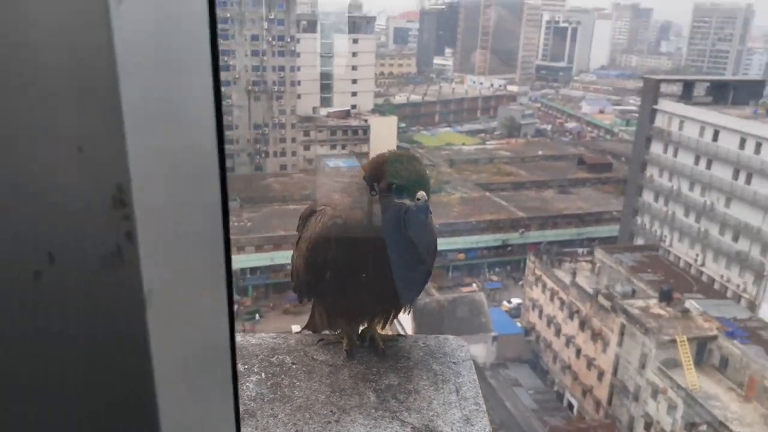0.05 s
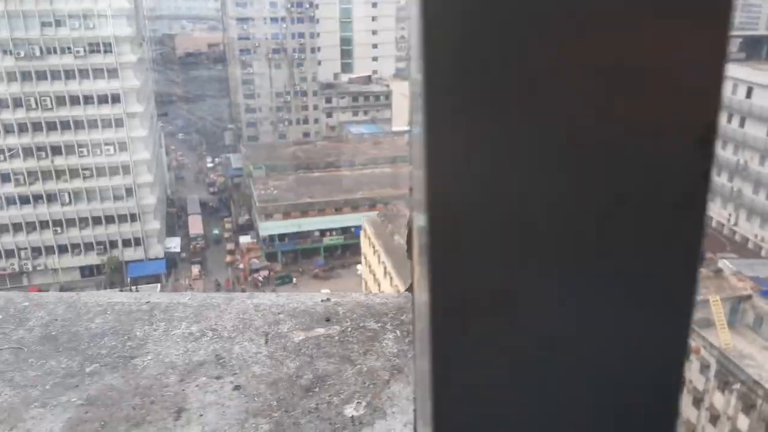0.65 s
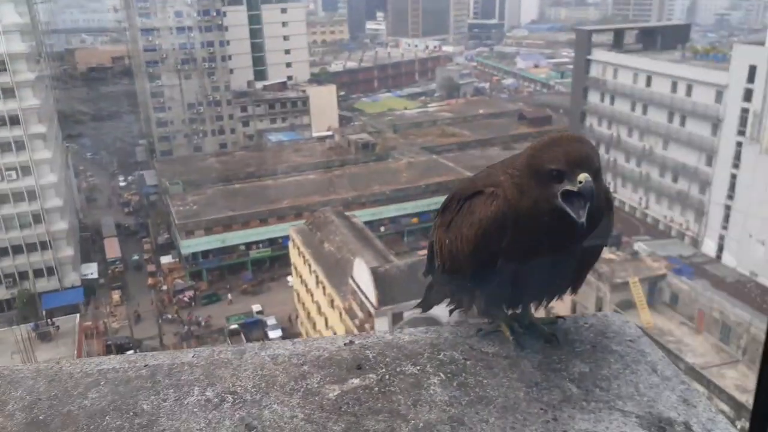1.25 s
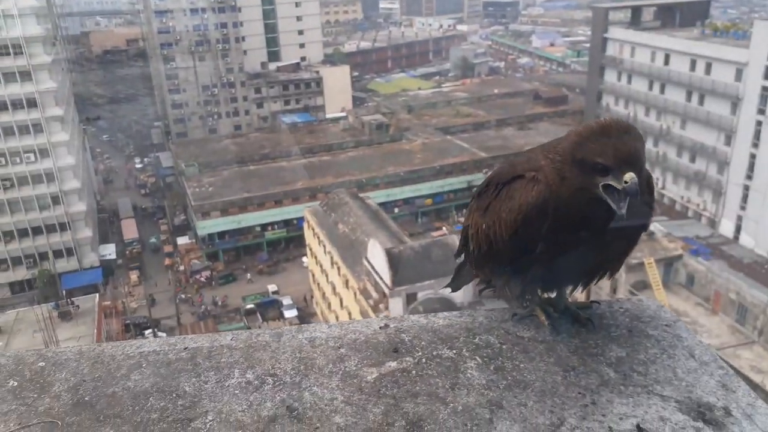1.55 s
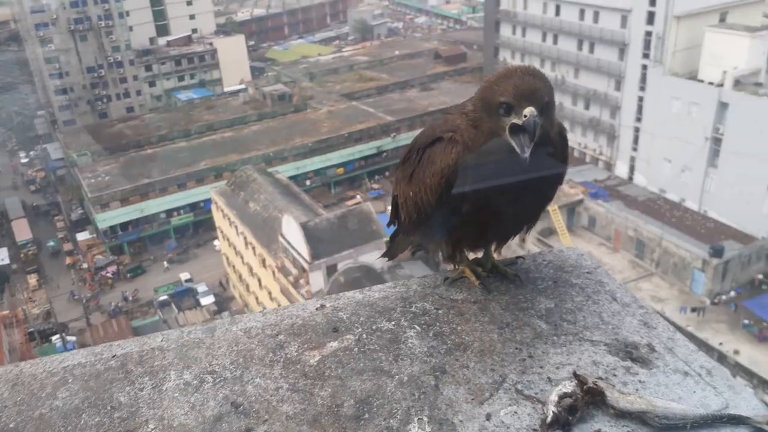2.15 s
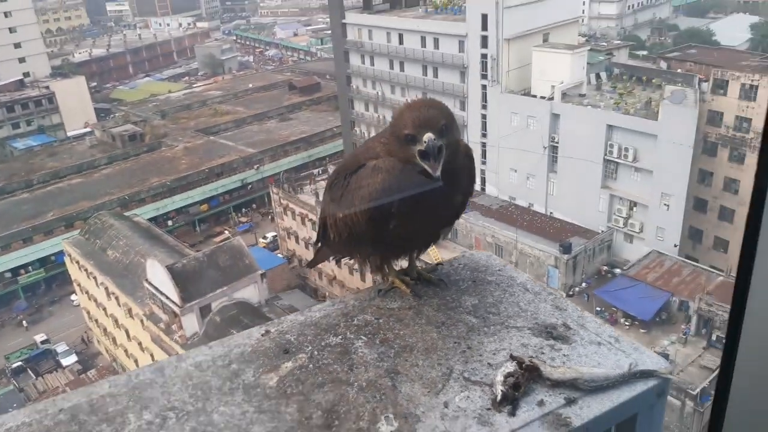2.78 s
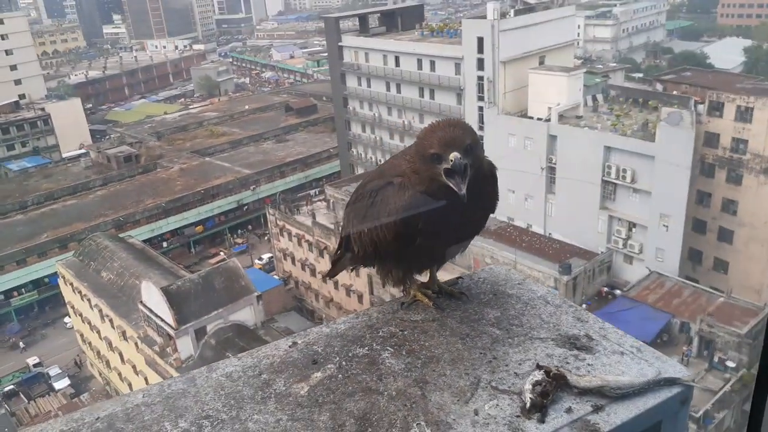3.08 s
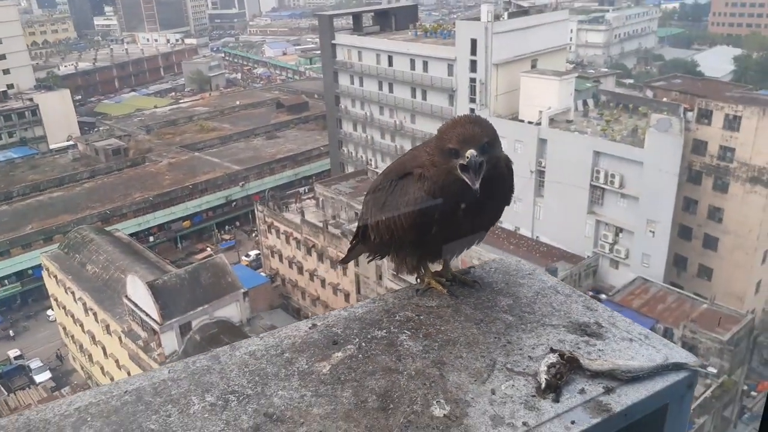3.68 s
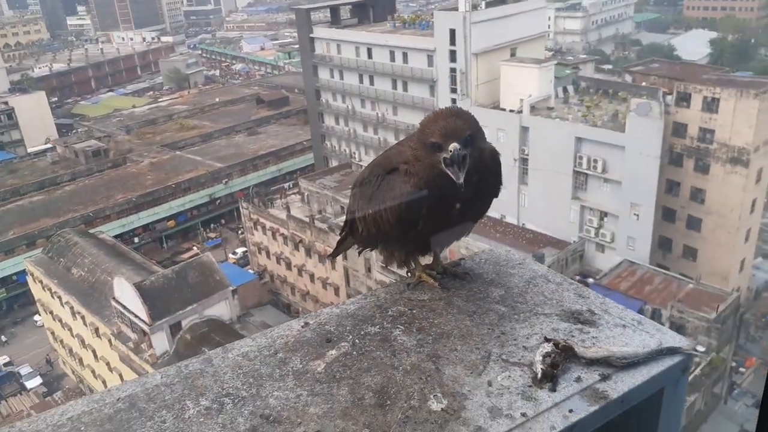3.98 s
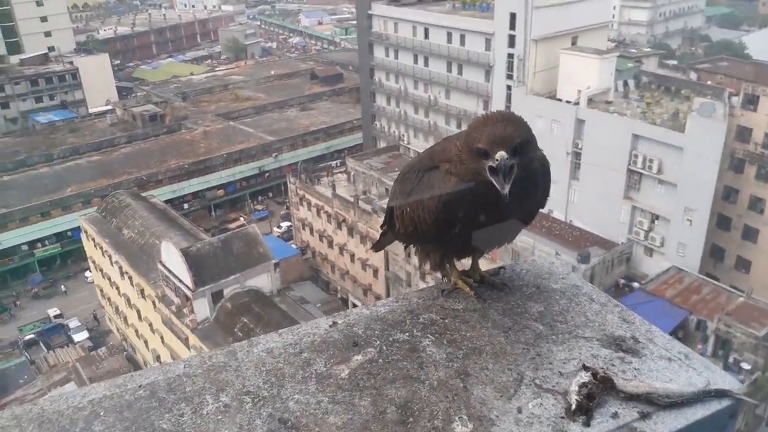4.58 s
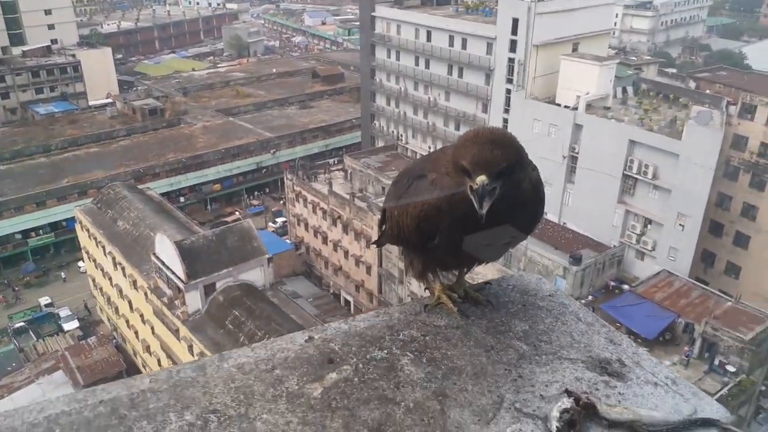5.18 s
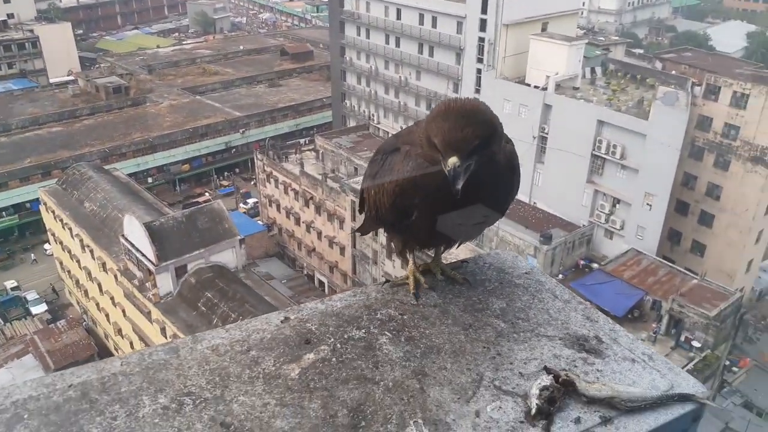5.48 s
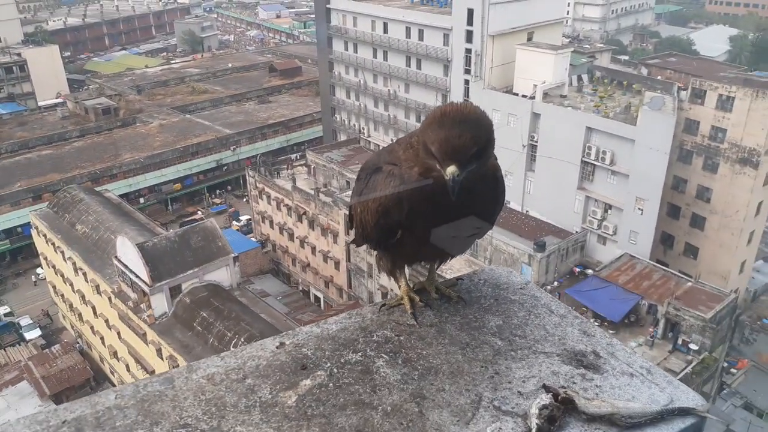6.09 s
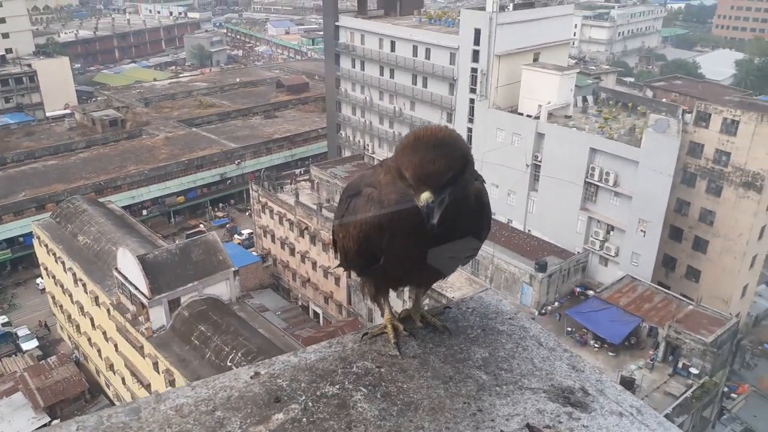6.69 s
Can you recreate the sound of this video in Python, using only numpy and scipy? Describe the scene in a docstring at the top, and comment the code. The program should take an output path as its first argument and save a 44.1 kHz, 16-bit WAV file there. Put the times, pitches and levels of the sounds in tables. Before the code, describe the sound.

A kite calls close by on a high ledge, each call a shrill, slightly hoarse whistle followed by a quick chitter of short notes. The call repeats about once a second, ringing a little in a bare room. Late on, a sliding window scrapes, rumbles and clacks sharply, then the bird calls once more. Traffic hums faintly far below, and the hand-held microphone picks up soft bumps and sleeve rustle.

```python
"""A kite calls from a high ledge at an open window: one long whistle, then a chitter of short arched notes.
Tension in its syrinx drives pitch and timbre, throat and beak colour the voice, and it rings on in the
bare room behind. The window is shoved along its track, scraping on grit and clacking once.
A hand-held camera is bumped and rubbed by a sleeve, and the city hums far below."""
import sys
import numpy as np
from scipy import signal
from scipy.fft import rfft, irfft, next_fast_len
from scipy.io import wavfile
from scipy.ndimage import map_coordinates

SR = 44100
rng = np.random.default_rng(int(sys.argv[2]) if len(sys.argv) > 2 else 0)


def pcm_store(signal):
    """Save signal as 16-bit PCM."""
    levels = np.round(np.clip(np.atleast_2d(signal), -1, 1) * 32767)
    wavfile.write(sys.argv[1], SR, levels.astype(np.int16).T)


N = 306054
TIME = np.arange(N) / SR


def amp(db):
    return 10 ** (np.asarray(db) / 20)


def unit_rms(x):
    return x / np.sqrt(np.mean(x ** 2) + 1e-20)


def lookup(rows, x, column=1):
    """A column interpolated linearly over the first."""
    columns = np.transpose(rows)
    return np.interp(x, columns[0], columns[column])


def at_hz(rows, hz):
    """Rows of f/Hz, value interpolated on a log axis."""
    row_hz, values = np.transpose(rows)
    return np.interp(np.log(hz + 1), np.log(row_hz + 1), values)


def wobble(knots_per_s):
    """Smooth random curve."""
    knots = rng.standard_normal(int(N * knots_per_s / SR) + 4)
    return map_coordinates(knots, [TIME * knots_per_s])


def filtered(x, response):
    """Zero-phase filter with gain response(hz)."""
    size = next_fast_len(N + SR // 2)
    return irfft(rfft(x, size) * response(np.fft.rfftfreq(size, 1 / SR)), size)[..., :N]


def pan(right_db):
    """Left and right gains."""
    return amp(np.array([[-1], [1]]) * right_db / 2)


def stroke(start_s, length_s, attack_s, t60_s):
    """Envelope: rise, hold, decay."""
    age_s = TIME - start_s
    return np.clip(age_s / attack_s, 0, 1) * amp(-60 * np.maximum(age_s - length_s, 0) / t60_s)


def strokes(rows, swell, t60_s):
    """Summed strokes, each easing in over the share swell of its length."""
    envelope = np.zeros(N)
    for start_s, length_s, db in rows:
        attack_s = swell * length_s
        ease = np.clip((TIME - start_s) / attack_s, 0, 1)
        envelope += amp(db) * ease * stroke(start_s, length_s, attack_s, t60_s)
    return envelope


def blows(rows, attack_s):
    """Summed impact envelopes with exponential decay."""
    envelope = np.zeros(N)
    for start_s, db, t60_s in rows:
        age_s = np.maximum(TIME - start_s, 0)
        envelope += amp(db - 60 * age_s / t60_s) * (1 - np.exp(-age_s / attack_s))
    return envelope


# diffuse field: f/Hz, left-right correlation
COHERENCE = [(60, 0.98), (130, 0.95), (290, 0.93), (640, 0.61), (1400, -0.12), (3000, -0.25), (15000, 0.11)]


def noise(spectrum):
    """Stereo noise of rms 1, alike in the bass, unrelated in the treble."""
    def mid_side_gains(hz):
        angle = np.arccos(np.clip(at_hz(COHERENCE, hz), -1, 1)) / 2
        return amp(at_hz(spectrum, hz)) * [np.cos(angle), np.sin(angle)]
    mid, side = filtered(rng.standard_normal((2, N)), mid_side_gains)
    return unit_rms(np.array([mid + side, mid - side]))


# bare room at decay_scale 1: f/Hz, t60/s
ROOM_DECAY = [(100, 0.68), (300, 0.89), (900, 1.07), (2000, 1.1), (3800, 0.99), (5500, 0.61), (8000, 0.53),
              (15000, 0.24)]


def room(x, decay_scale):
    """Reverberation off hard walls; treble dies first."""
    white = noise([(20, 0), (20000, 0)])[:, :SR + SR // 2]
    hz, age_s, bins = signal.stft(white, SR, nperseg=256)
    t60_s = decay_scale * at_hz(ROOM_DECAY, hz)[:, None]
    tail = signal.istft(bins * amp(-60 * age_s / t60_s), SR, nperseg=256)[1]
    tail /= np.linalg.norm(tail, axis=1, keepdims=True)
    delayed = np.pad(tail, ((0, 0), (SR // 400, 0)))
    return signal.fftconvolve(np.atleast_2d(x), delayed, axes=1)[:, :N]


# far horns and brakes: start/s, end/s, f/Hz, level/dB
HORNS_AND_BRAKES = [(0, 0.154, 2820, -63.5), (0, 0.123, 1105, -69), (0.363, 0.493, 533, -65),
                    (0.48, 0.618, 3150, -53.5)]


def horns_and_brakes(ramp_s=0.028, jitter=0.0078):
    """Brief wavering tones, heard only as reverberation."""
    tones = np.zeros(N)
    for start_s, end_s, hz, db in HORNS_AND_BRAKES:
        gate = np.clip(np.minimum(TIME - start_s, end_s - TIME) / ramp_s, 0, 1)
        pitch_hz = hz * (1 + jitter * wobble(300))
        tones += amp(db) * gate * np.sin(2 * np.pi * np.cumsum(pitch_hz) / SR)
    return amp(5) * room(tones, decay_scale=0.29)


# traffic hum and street wash: f/Hz, relative density/dB
TRAFFIC_SPECTRUM = [(13, -66.5), (22, -29.5), (47, -11), (81, 3.5), (123, -3.5), (155, -3), (269, -9),
                    (349, -8), (376, -14.5), (487, -9), (700, -18.5), (910, -47), (1540, -120)]
STREET_SPECTRUM = [(180, -54.5), (300, -33), (356, 8), (466, -14), (538, -23), (586, -7), (1100, -6),
                   (2650, -2.5), (3180, -2.5), (3890, -13.5), (9000, -33), (11700, -88), (19800, -120)]


def city(hum_db=-53, wash_db=-55):
    """Traffic far below, louder while the microphones are at the open gap."""
    at_gap = stroke(start_s=0.76, length_s=5, attack_s=0.22, t60_s=2.44)
    hum = amp(hum_db + 5 * at_gap + 0.22 * wobble(8.6)) * noise(TRAFFIC_SPECTRUM)
    wash = amp(wash_db + 2 * at_gap + 1.2 * wobble(7.2)) * noise(STREET_SPECTRUM)
    return hum * pan(right_db=0.5) + wash * pan(right_db=4)


# hand bumps: t/s, level/dB, t60/s
HAND_BUMPS = [(.828, -38.5, 0.44), (1.24, -40.5, 0.99), (1.36, -44, 0.75), (2.14, -45, 0.52),
              (4.195, -36, 0.4), (6.825, -37, .6), (6.885, -41, 0.53)]
# sleeve brushes: start/s, length/s, level/dB
SLEEVE_BRUSHES = [(.11, .23, -60.5), (.76, 0.34, -59.5), (1.32, 0.072, -54.5), (1.49, .35, -59),
                  (2.08, 0.11, -56.5), (2.35, 0.55, -61), (3.2, 0.55, -68.5), (3.83, 0.11, -57.5),
                  (4.05, .4, -53), (4.55, 0.31, -59.5), (6.39, 0.045, -75.5), (6.82, 0.15, -54)]
# bump and sleeve noise: f/Hz, relative density/dB
BUMP_SPECTRUM = [(53, -43), (90, -17), (141, -3.5), (168, 4.5), (231, -8), (285, -2.5), (545, -9.5),
                 (959, -20.5), (1500, -17.5), (1950, -41), (3300, -120)]
SLEEVE_SPECTRUM = [(200, -11), (500, 16), (1500, 4), (4000, 8.5), (7000, 1), (12000, -1), (16000, -3.5)]


def handling():
    """A hand bumps the camera dully; a sleeve rustles near the microphones."""
    bumps = blows(HAND_BUMPS, attack_s=0.0021) * noise(BUMP_SPECTRUM)
    rubbing = strokes(SLEEVE_BRUSHES, swell=0.3, t60_s=0.99) * amp(0.95 * wobble(100))
    return bumps + rubbing * noise(SLEEVE_SPECTRUM) * pan(right_db=4)


# shoves and roller travel: start/s, length/s, level/dB
WINDOW_SHOVES = [(5.16, 0.17, -28), (5.243, .04, -28.5), (5.382, 0.041, -21.5), (5.436, 0.04, -19),
                 (5.538, 0.044, -19)]
ROLLER_RUN = [(5.14, 0.4, -31.5)]
# heavy frame hitting its track: t/s, level/dB, t60/s
FRAME_THUD = [(5.44, -19.5, 0.18)]
FRAME_CLACK = [(5.4578, -1, 0.0091), (5.4643, -19, 0.0061), (5.472, -3, 0.012)]
# track, roller and clack noise: f/Hz, relative density/dB
SCRAPE_SPECTRUM = [(240, -24), (400, -10), (570, -12), (826, -10.5), (906, -12.5), (1070, -6.5),
                   (1650, -2.5), (2710, -3), (2970, -8.5), (4430, -9.5), (5850, -16.5), (14100, -25.5),
                   (16000, -21.5)]
ROLLER_SPECTRUM = [(20, -72), (35, -50), (60, -17.5), (161, -1.5), (253, 1.5), (461, -11), (553, -12),
                   (592, -14), (786, -13.5), (900, -20), (1170, -21), (1980, -120)]
CLACK_SPECTRUM = [(30, -46), (60, -26.5), (200, 2), (500, -13), (1000, 13.5), (3000, 11), (5800, 10),
                  (8500, -5), (15000, -13)]


def window():
    """Grit catches in the track at each shove, the rollers rumble, the frame thuds and clacks."""
    grit = unit_rms(amp(2 * wobble(500) + 1.2 * wobble(70)))
    shoves = strokes(WINDOW_SHOVES, swell=0.33, t60_s=0.16)
    scrape = shoves * grit * noise(SCRAPE_SPECTRUM) * pan(right_db=3.5)
    weight = strokes(ROLLER_RUN, swell=0.14, t60_s=0.4) + blows(FRAME_THUD, attack_s=0.0147)
    rumble = weight * amp(2.5 * wobble(60)) * noise(ROLLER_SPECTRUM)
    clack = blows(FRAME_CLACK, attack_s=0.00029) * noise(CLACK_SPECTRUM) * pan(right_db=-3.5)
    bright_tail = amp(-7) * room(scrape + clack, decay_scale=1.46)
    low_tail = amp(-11) * room(rumble, decay_scale=1.72)
    return scrape + rumble + clack + bright_tail + low_tail


def recess(x, count=7, reflection=0.41):
    """Pane, frame and ledge return copies within 20 ms; the glides beat against them."""
    pair = np.array([x, x])
    for channel in pair:
        for delay_s in rng.uniform(0.002, 0.02, count):
            channel += reflection * rng.choice([-1, 1]) * np.pad(x, (round(delay_s * SR), 0))[:N]
    return pair


# whistle opening each call: start/s, length/s, level/dB
LONG_WHISTLES = [(1.01, 0.24, -39.5), (2.085, 0.2, -37), (3.057, .174, -34.5), (4.03, .189, -33.5),
                 (4.975, .187, -33.5), (6.577, 0.25, -37)]
# short arched notes: peak t/s, peak tension, level/dB
CHITTER_NOTES = [(1.346, 1.02, -35), (1.475, 0.95, -34), (1.59, 0.93, -38), (1.726, 0.82, -37),
                 (2.38, 1.37, -27.5), (2.509, 1.13, -28.5), (2.634, .89, -27), (2.772, .89, -29),
                 (3.323, .94, -28), (3.449, .84, -27), (3.565, 0.89, -28), (3.701, .85, -29.5),
                 (4.301, 0.79, -26.5), (4.425, 0.65, -24.5), (4.534, 0.81, -27), (4.657, .92, -29.5),
                 (5.251, .72, -28), (5.364, .79, -27.5), (5.63, .71, -32), (6.917, 1, -27.5)]


def notes(whistle_rise_s=0.058, whistle_tension=1.5, whistle_tuning=0.975, chitter_rise_s=0.054):
    """All notes in order: start/s, peak/s, end/s, peak tension, pitch factor, level/dB."""
    rows = []
    for start_s, length_s, db in LONG_WHISTLES:
        peak_s = start_s + whistle_rise_s
        rows.append((start_s, peak_s, start_s + length_s, whistle_tension, whistle_tuning, db))
    for peak_s, tension, db in CHITTER_NOTES:
        fall_s = 0.052 / tension ** 0.5  # slacker notes fall more slowly
        rows.append((peak_s - chitter_rise_s, peak_s, peak_s + fall_s, tension, 1, db))
    return sorted(rows)


# voice sinking from call to call: t/s, pitch factor
PITCH_SINK = [(1.6, 1.055), (2.4, 1.025), (3.4, 1.012), (5.4, 1.0), (6.6, .92)]


def gestures(rise_power=1.1, fall_power=1.35):
    """Tension arches in each note; a hard-driven note bursts out, a gentle one swells."""
    tension, tuning, envelope, burst = np.zeros(N), np.ones(N), np.zeros(N), np.zeros(N)
    for start_s, peak_s, end_s, peak_tension, pitch_factor, db in notes():
        on = TIME >= start_s
        t = TIME[on]
        rise = np.sin(np.pi / 2 * np.minimum((t - start_s) / (peak_s - start_s), 1))
        fall = np.abs(np.cos(np.pi / 2 * np.minimum((t - peak_s) / (end_s - peak_s), 1)))
        tension[on] = peak_tension * np.where(t < peak_s, rise ** rise_power, fall ** fall_power)
        tuning[on] = pitch_factor * lookup(PITCH_SINK, start_s)
        force = np.interp(peak_tension, [0.6, 1.3, 1.5], [0.1, 0.5, 1])
        attack_s = np.interp(force, [0.5, 1], [0.032, 0.005])
        burst[on] = force * np.interp(t - start_s, [0, 0.02, 0.04], [1.2, 1.2, 0.2])
        envelope = np.maximum(envelope, amp(db) * stroke(start_s, end_s - start_s, attack_s, t60_s=0.08))
    return tension, tuning, envelope, burst


# register jumps: tension, f/Hz before tuning
SYRINX_REGISTERS = [(0, 2220), (.45, 2740), (.65, 2970), (.8, 3040), (.81, 3760), (1, 3900), (1.3, 4130),
                    (1.31, 5700), (1.8, 6300)]
# timbre: tension, fundamental/dB, overtones/dB, hoarseness 0-1
SYRINX_TIMBRE = [(0, -5, -22, .6), (.3, -3, -16, .45), (.5, 2, -1, .14), (.8, 4.5, 3, .1),
                 (.82, -6.5, -7, .25), (1.28, -2, -5, .45), (1.34, -4.5, -20, .8)]


def syrinx(tension, tuning, envelope, burst, rasp=0.87, flutter_db=3.5, jitter=0.00545):
    """Tension sets pitch and timbre; irregular flapping of the membrane adds hoarse sidebands."""
    tone_db, overtone_db, hoarseness = [lookup(SYRINX_TIMBRE, tension, column) for column in (1, 2, 3)]
    pitch_hz = tuning ** np.minimum(2 * tension, 1) * lookup(SYRINX_REGISTERS, tension)
    pitch_hz *= 1 + jitter * (wobble(110) + wobble(450))
    phase = 2 * np.pi * np.cumsum(pitch_hz) / SR
    flap = rasp * np.maximum(hoarseness, burst) * wobble(1300)
    sputter = 0.45 + wobble(500)
    tone = amp(tone_db) * np.sin(phase) * (1 + flap)
    overtones = amp(overtone_db) * (amp(-3) * np.sin(2 * phase) + amp(-20) * np.sin(3 * phase))
    flutter = amp(flutter_db * wobble(90))
    return np.sqrt(2) * envelope * flutter * (tone + sputter * overtones)


# throat and open-beak resonances: f/Hz, gain/dB
THROAT_RESPONSE = [(1200, -49.5), (1900, -3), (2250, -3), (2500, -8), (2780, -1.5), (3000, -8.5),
                   (3300, -8.5), (3600, -1), (3870, 2), (4100, -11.5), (4500, -12), (5200, -38),
                   (5650, -16.5), (6000, -25), (6600, -31.5), (7650, -23.5), (9000, -35.5), (14000, -46)]
# air through the beak: f/Hz, relative density/dB
BEAK_SPECTRUM = [(250, -24), (550, -5.5), (1100, 1.5), (2000, -17), (3100, 7.5), (4000, -2.5), (6000, -5),
                 (10000, -32), (15000, -43)]
# bird's bearing from the moving camera: t/s, right over left/dB
KITE_BEARING = [(1.2, 5), (2.7, 5), (4.5, 3.5), (6.6, 4.5)]


def kite():
    """Whistle and hiss pass the throat, then feed recess and room in parallel; air leaves the beak."""
    tension, tuning, envelope, burst = gestures()
    whistle = syrinx(tension, tuning, envelope, burst)
    hiss = amp(-6) * envelope * rng.standard_normal(N)
    voice = filtered(whistle + hiss, lambda hz: amp(at_hz(THROAT_RESPONSE, hz)))
    air = amp(-19.5) * envelope * noise(BEAK_SPECTRUM)
    near = amp(-3.5) * recess(voice) + air
    tail = amp(-5) * room(voice + air, decay_scale=0.94)
    return (near + tail) * pan(lookup(KITE_BEARING, TIME))


def scene():
    return kite() + window() + handling() + city() + horns_and_brakes()


def record(dry):
    """The camera adds faint microphone hiss and limits the band."""
    hiss_db, cutoff_hz = -77.5, 15900
    hiss = amp(hiss_db) * rng.standard_normal((2, N))
    return filtered(dry + hiss, lambda hz: hz < cutoff_hz)


dry = scene()
out = record(dry)
pcm_store(out)
```